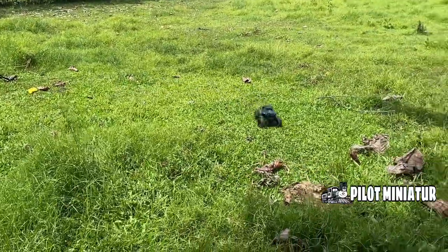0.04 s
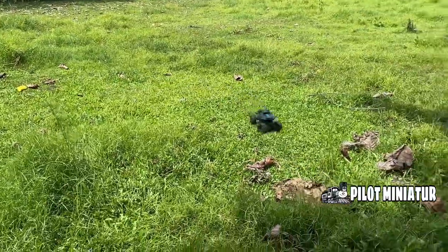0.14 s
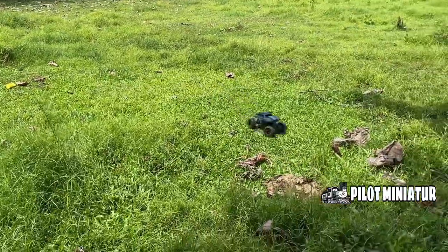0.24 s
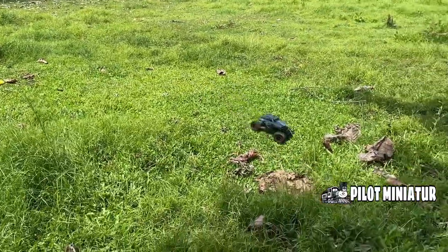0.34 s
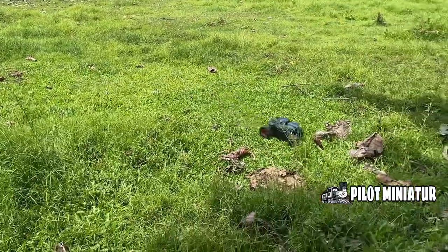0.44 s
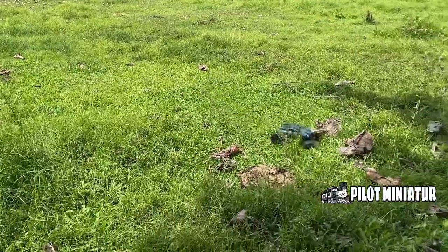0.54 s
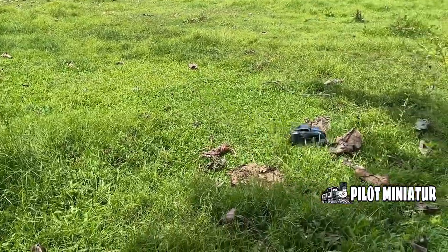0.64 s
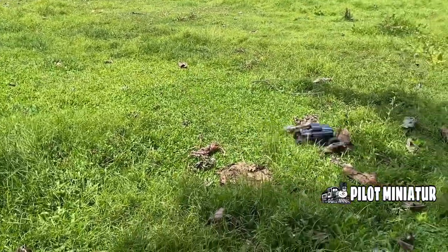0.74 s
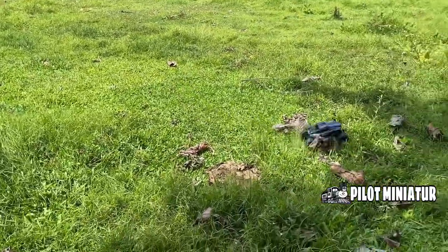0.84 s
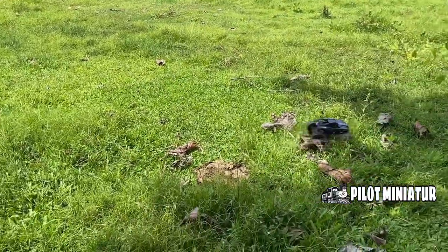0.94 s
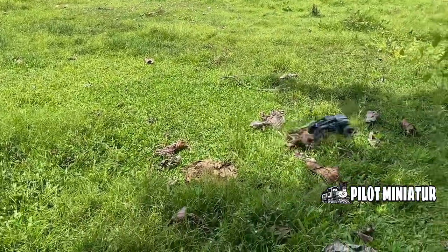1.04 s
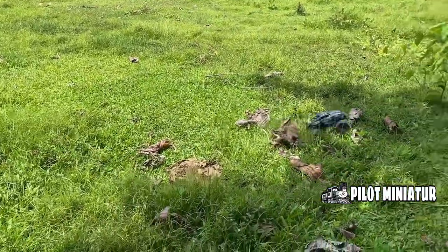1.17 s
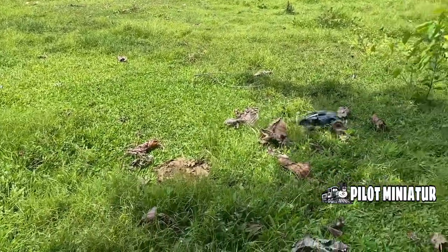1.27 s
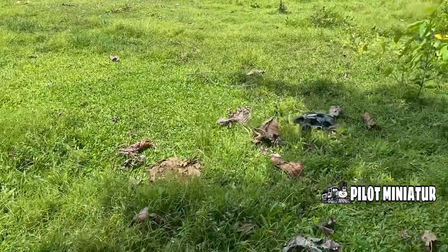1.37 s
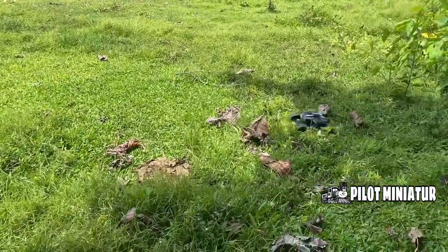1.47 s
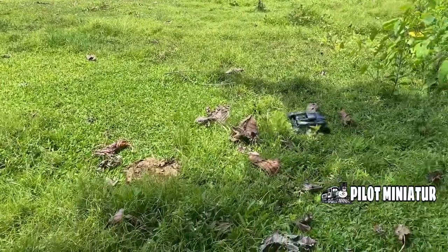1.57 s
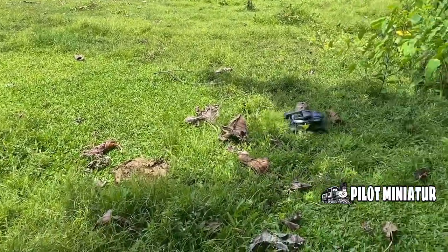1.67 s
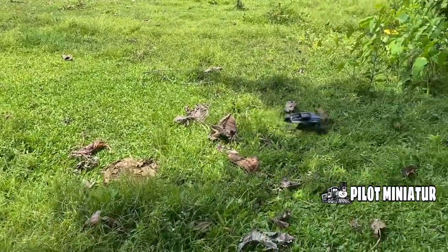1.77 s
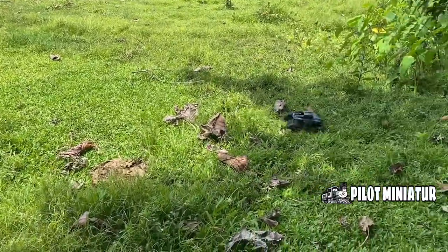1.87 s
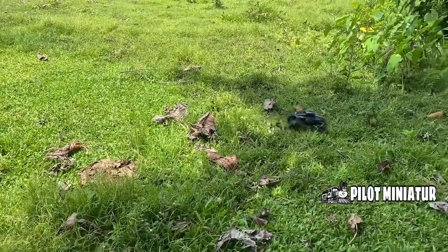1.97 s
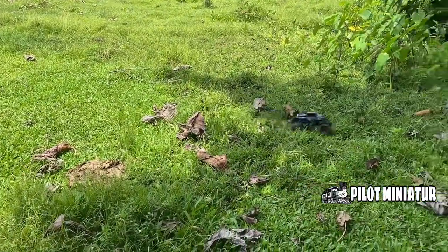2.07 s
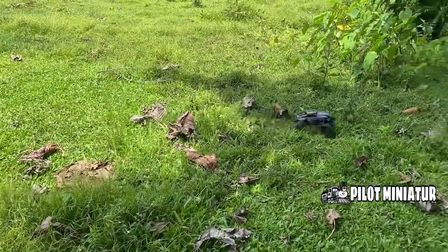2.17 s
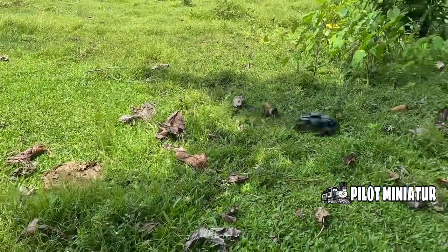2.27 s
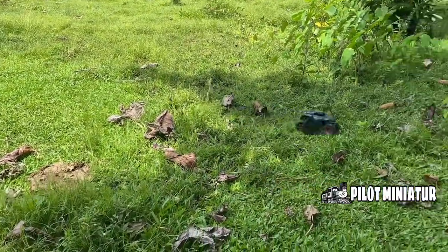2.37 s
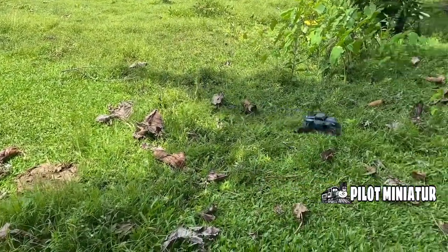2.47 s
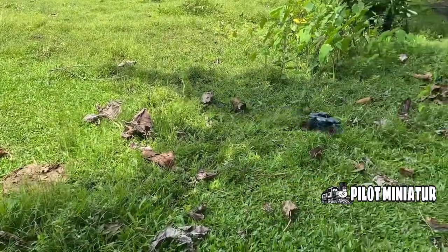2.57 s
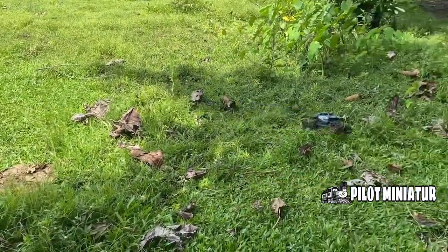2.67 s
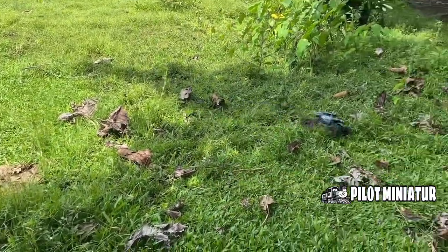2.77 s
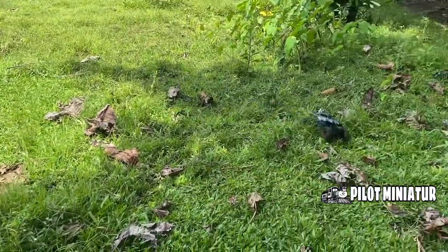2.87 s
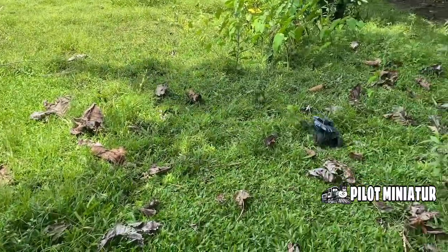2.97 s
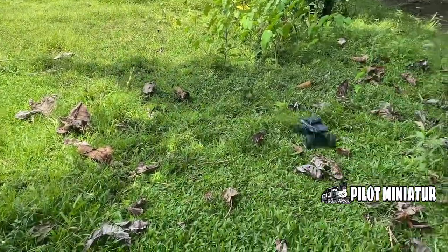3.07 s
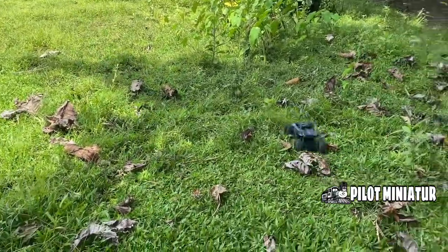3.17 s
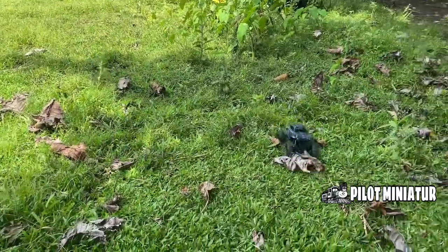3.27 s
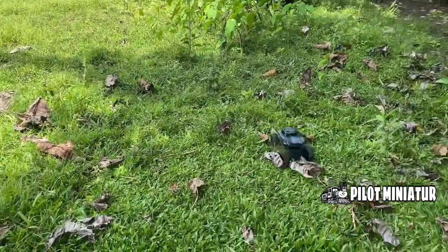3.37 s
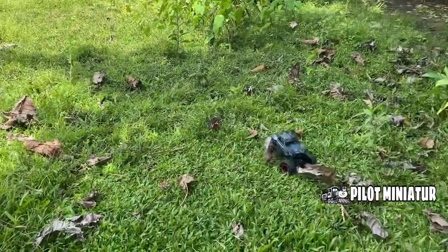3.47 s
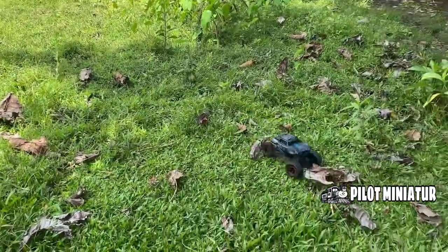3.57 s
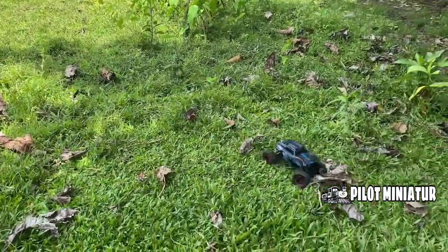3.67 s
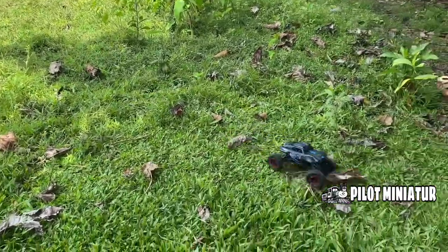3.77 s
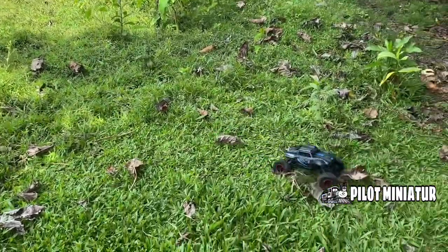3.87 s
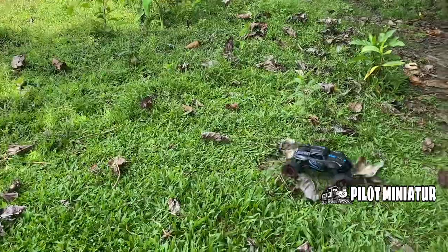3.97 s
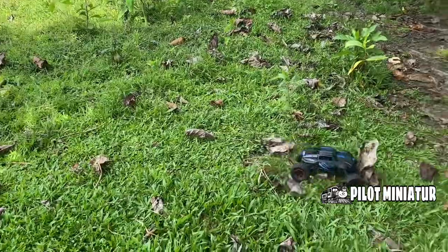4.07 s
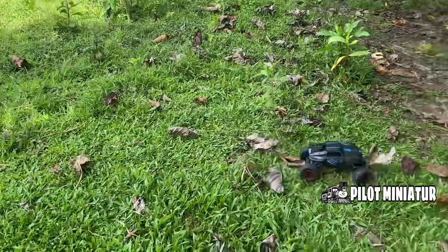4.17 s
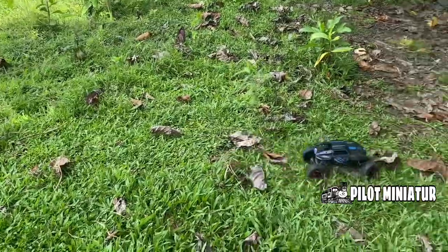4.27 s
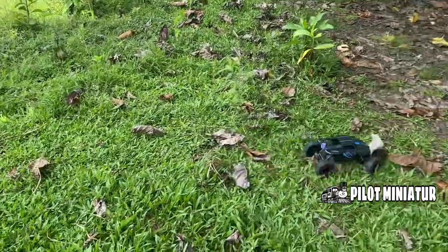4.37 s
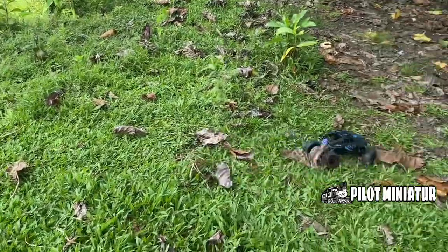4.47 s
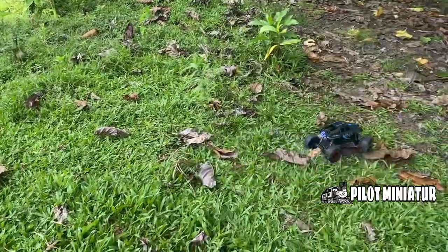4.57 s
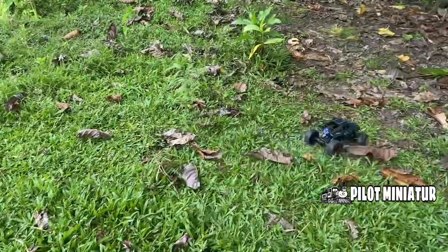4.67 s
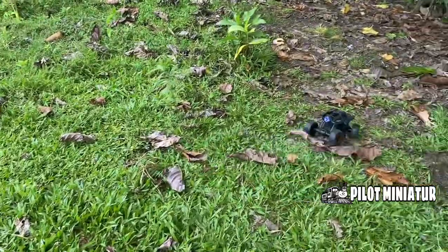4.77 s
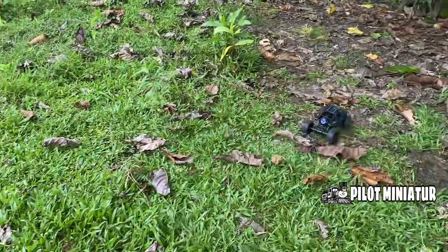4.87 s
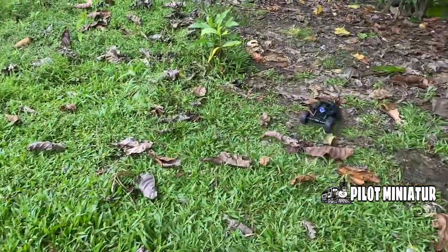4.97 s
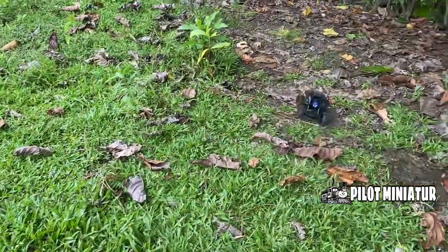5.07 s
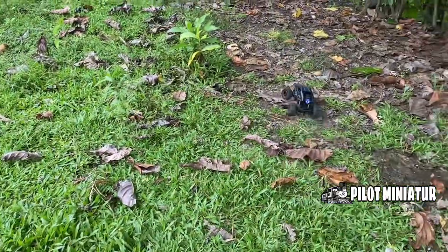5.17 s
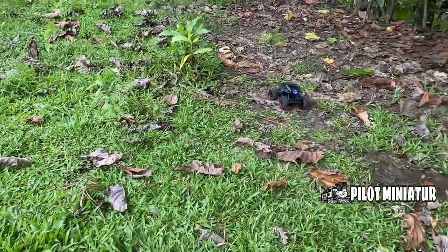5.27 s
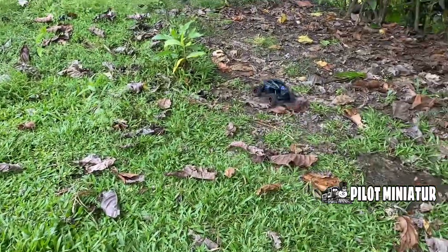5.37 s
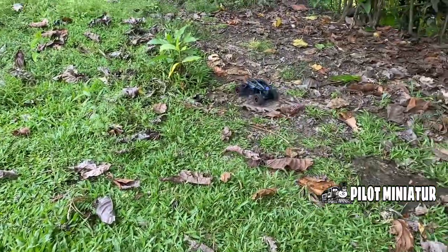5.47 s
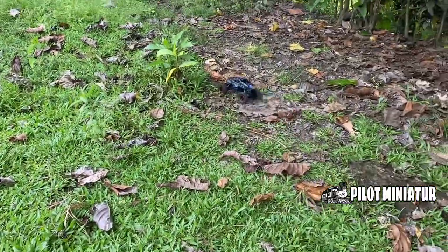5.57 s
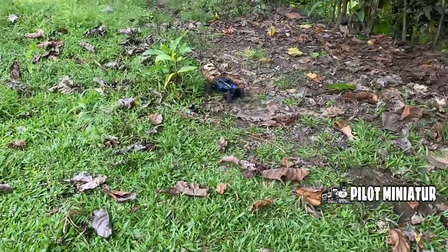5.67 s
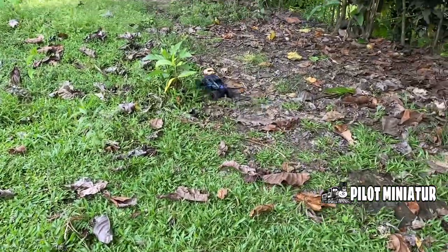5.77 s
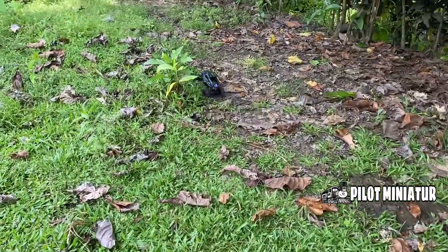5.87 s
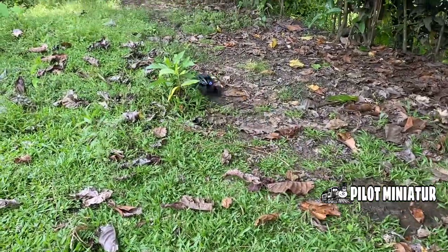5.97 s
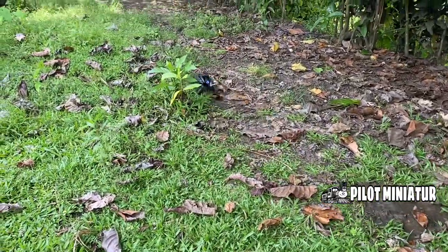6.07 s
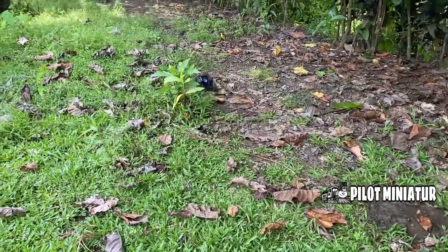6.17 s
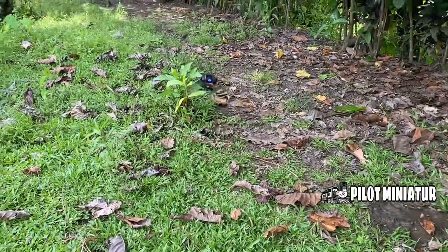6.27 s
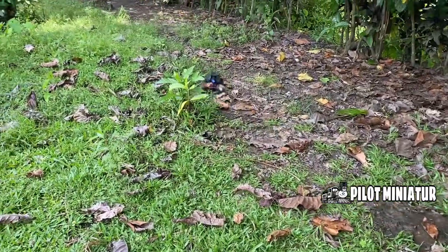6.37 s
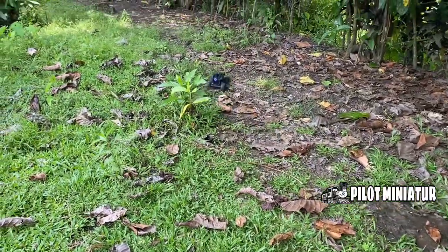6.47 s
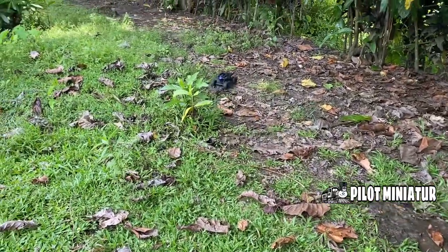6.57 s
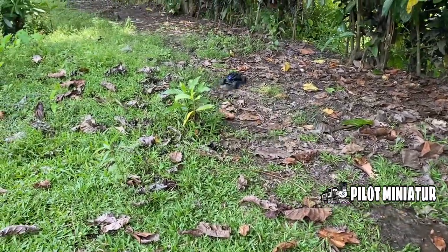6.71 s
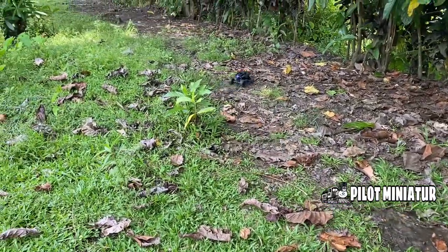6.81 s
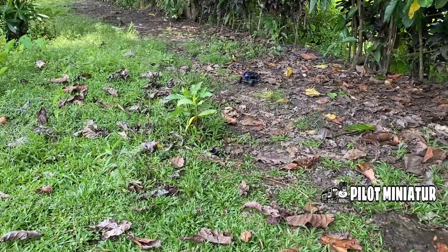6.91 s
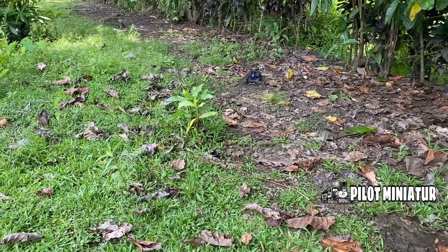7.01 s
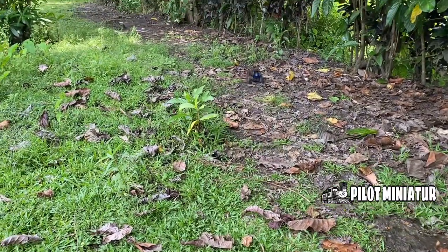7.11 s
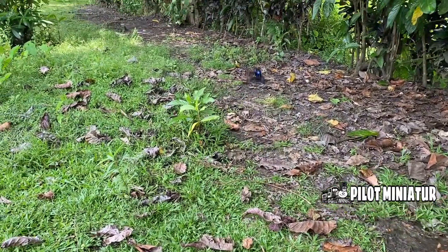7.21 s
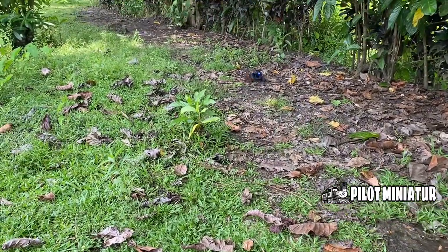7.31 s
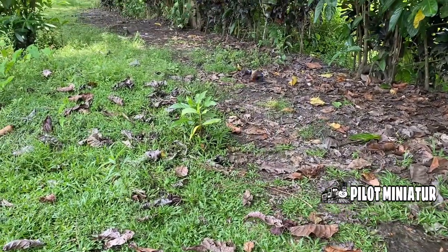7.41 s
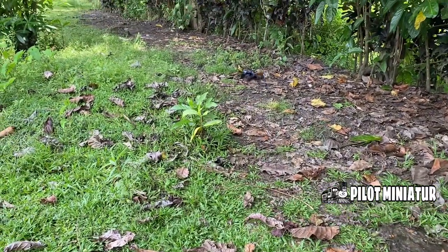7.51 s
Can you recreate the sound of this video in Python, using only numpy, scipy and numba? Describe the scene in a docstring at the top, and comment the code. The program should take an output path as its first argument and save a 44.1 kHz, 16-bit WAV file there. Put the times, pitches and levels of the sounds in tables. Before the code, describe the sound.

A toy car with a buzzing geared motor bumps across a lawn, heard from a few metres away in open air. Tyres hiss in uneven surges through tufts, hollow plastic chatters, and brittle leaves snap in two main clusters, early and midway. Brief wavering gear whines appear between them. After a hard clack the wheels drum on bare ground and the car recedes. Low road rumble and a faint distant engine lie behind, nearly mono.

```python
"""A small electric toy car drives over a lawn, ploughs through dry leaves close by and runs off over bare earth.
Its motor is a repeating clatter of gear teeth; its tyres swish and crackle as streams of tiny random impacts.
Bumps shake or strike the resonances of its plastic shell, and short bursts of noise make leaves snap.
Behind it, filtered noise gives road rumble, the hiss of the garden and puffs of wind on the microphone;
a few related low tones give a distant engine."""
import sys
import numpy as np
from scipy import signal
from scipy.fft import rfft, irfft
from scipy.io import wavfile
from scipy.ndimage import uniform_filter1d
from numba import njit

SR = 44100
rng = np.random.default_rng(int(sys.argv[2]) if len(sys.argv) > 2 else 0)


def transcribe(signal):
    """Save signal, clipped to [-1, 1], as a 16-bit WAV file at the path in sys.argv[1]."""
    frames = np.atleast_2d(signal).T
    limited = np.clip(frames, -1, 1)
    pcm = np.round(limited * 32767).astype(np.int16)
    wavfile.write(sys.argv[1], SR, pcm)


N = 332778
TIME = np.arange(N) / SR

# Background
# distant traffic, before a fixed lift: time_s, level_db
TRAFFIC = [(0, -60), (.6, -59), (1.05, -61), (1.2, -58), (2.9, -59.5), (3.85, -56), (4.33, -58.5),
           (4.5, -63), (5.0, -65.5), (5.2, -57), (5.4, -61.5), (5.77, -60), (5.85, -71), (6.15, -64),
           (6.3, -58.5), (6.55, -60), (6.72, -58), (7.55, -55.5)]
# one engine standing out of the traffic: time_s, firing_rate_hz, level_relative_to_road_db
ENGINE = [(0, 38.87, -25), (1.3, 33.25, -10), (1.7, 31.5, 3.5), (2.1, 31.26, 4.5), (2.45, 32.53, 4.5),
          (2.8, 33.5, -4), (3.6, 43.76, -12), (4.2, 35.93, -11), (5.5, 45.93, -8), (6.55, 38.6, -27),
          (6.7, 37.75, 7), (7.55, 38.26, 2.5)]
# resonance of the exhaust pipe: pitch_hz, gain_db
EXHAUST = [(95, -17.5), (125, 6), (152, 8), (165, 2.5), (195, -6), (240, -25)]
# tone of the road noise, and of the hiss of the garden: pitch_hz, relative_level_db
RUMBLE = [(20, -21), (45, -24), (72, -14), (100, -5.5), (150, 0.5), (200, -1), (250, -5.5), (320, -28),
          (450, -24), (1000, -93)]
AIR = [(50, 10.5), (300, 3.5), (460, -3), (730, -6), (950, -17), (1250, -20), (1900, 6.5), (3000, -17),
       (5800, 10), (9500, -5), (12000, 4), (14000, 6), (16000, 3)]
# tone of the wind: pitch_hz, relative_level_db
EDDIES = [(20, -29), (50, -10), (90, -5.0), (160, 5), (400, -21.0)]
# puffs of wind on the microphone: middle_s, spread_s, level_db
PUFFS = [(0.24, 0.12, -53), (0.414, 0.037, -49), (0.615, 0.017, -45.5), (0.965, .012, -60)]

# The car and the ground
# the car's path: time_s, distance_from_microphone_m
PATH = [(0, 3.27), (.9, 2.78), (1.5, 3.4), (2.3, 4.2), (3.0, 2.74), (3.6, 2.03), (4.3, 3.1), (4.8, 2.84),
        (5.3, 3.86), (6.2, 4.4), (7.55, 5.37)]
# unevenness of the ground under the wheels: time_s, rattle_level_at_1_m_db (before a small lift)
GROUND = [(0, -55), (.6, -48), (1.05, -52), (1.15, -51.5), (1.35, -55.5), (1.5, -46), (1.72, -54),
          (1.88, -47), (2.2, -49), (2.5, -49.5), (2.9, -53), (3.7, -48.5), (4.38, -43.5), (4.6, -43.5),
          (5.05, -47.5), (5.27, -46.5), (5.5, -48), (6.4, -50), (7.55, -47.5)]
# jolts that set the shell rattling: start_s, length_s, rattle_level_at_1_m_db (before a small lift)
JOLTS = [(.15, 0.17, -48), (.345, 0.16, -48.5), (.62, 0.19, -44), (.77, 0.1, -38), (.87, 0.1, -43.5),
         (1.41, 0.061, -48), (1.81, 0.076, -53), (2.34, 0.14, -50), (3.0, 0.088, -49), (3.25, 0.049, -49),
         (3.42, 0.17, -45), (3.69, .11, -45.5), (3.81, 0.16, -41.5), (3.99, 0.24, -40), (4.515, 0.024, -44),
         (4.9, 0.038, -41), (5.13, 0.066, -45), (5.655, 0.053, -39), (5.78, 0.072, -44), (6.03, 0.071, -50),
         (6.21, 0.096, -63), (6.72, 0.032, -44.5), (7.35, 0.062, -40)]
# hops, when the wheels go light and the rolling sounds drop: middle_s, spread_s
HOPS = [(2.003, 0.032), (3.592, 0.02), (4.385, 0.019), (4.882, 0.012), (5.259, 0.022), (6.4, 0.031),
        (6.983, 0.048), (7.283, 0.028)]
HOP_DB = -3  # change in the middle of a hop
# tufts and leaf litter that the tyres plough through: start_s, length_s, swish_level_at_1_m_db (before trims)
TUFTS = [(0.015, 0.14, -35), (0.172, 0.45, -43.5), (0.7, 0.056, -36), (0.761, 0.077, -36),
         (0.858, 0.094, -35.5), (0.999, 0.1, -38.5), (1.363, 0.2, -38), (1.599, 0.29, -44),
         (1.799, 0.11, -36), (1.898, 0.039, -41), (2.059, 0.099, -40), (2.322, 0.1, -41),
         (2.999, 0.166, -48), (3.167, 0.14, -35), (3.37, 0.14, -37), (3.546, 0.065, -47),
         (3.685, 0.3, -46.5), (3.981, 0.19, -46), (4.201, .16, -45), (4.404, 0.21, -45),
         (4.693, 0.073, -40), (4.761, 0.044, -44.5), (4.903, 0.031, -39), (4.994, 0.025, -39),
         (5.134, 0.098, -39), (5.296, 0.084, -39), (5.401, 0.19, -39.5), (5.643, 0.13, -39),
         (5.969, 0.26, -43), (6.494, 0.085, -38), (6.625, 0.11, -38.5), (6.872, 0.047, -45),
         (7.015, 0.14, -40), (7.335, 0.086, -37.5), (7.499, 0.11, -40)]
# patches of dry leaves crushed under the wheels: start_s, length_s, crunch_level_at_1_m_db
LITTER = [(.34, 0.071, -50), (.5, 0.052, -43), (.69, 0.1, -34), (.78, 0.051, -38.5), (.86, 0.25, -48),
          (3.27, 0.066, -42.5), (3.42, 0.09, -45), (3.72, 0.27, -37.5), (3.99, 0.08, -43),
          (4.07, 0.094, -35.5), (4.16, 0.234, -42), (4.44, 0.19, -43.5), (4.69, 0.052, -36),
          (5.13, 0.12, -47), (6.73, 0.023, -45)]
# times to enter and leave a tuft or patch, and for a jolt to start and die away
TUFT_ATTACK_S, TUFT_RELEASE_S, JOLT_ATTACK_S, JOLT_RELEASE_S = .028, .016, .018, .014
ROLL_DB = -41  # swish of steady rolling at 1 m, before trims
# the wheels bounce and grip unevenly, and judder faster: rate a second and swing of the level
BOUNCE_RATE, BOUNCE_DB, JUDDER_RATE, JUDDER_DB = 16, .7, 55, 1.0
# the car reaches bare earth around this time; hard earth makes tyres drum and chassis buzz (levels at 1 m)
BARE_EARTH_S, EARTH_DRUM_DB, EARTH_BUZZ_DB = 4.89, -55, -62
# chassis buzz relative to the ground's unevenness, and drumming relative to the rattle
BUZZ_SHARE_DB, DRUM_SHARE_DB = -8, -15

# Single blows
# dull thumps on the turf: start_s, peak_db, pitch_hz
THUMPS = [(.36, -38, 97), (0.379, -45, 84), (0.422, -38, 147), (0.504, -41.5, 114.6), (0.539, -46, 173),
          (0.579, -39.5, 165), (3.862, -44, 190.6), (5.512, -42, 176.8)]
THUMP_RISE_S = .01  # from the start of a thump to its fullest swell
# wheels and shell hitting the ground: start_s, peak_db, pitch_hz, low_thud_relative_to_clack_db
KNOCKS = [(0.206, -40.5, 1160, -14), (0.24, -39, 555, 1), (.257, -38.5, 606, -10), (0.348, -37.5, 1220, 1),
          (.361, -46, 776, -12), (0.426, -40, 1370, 5), (0.505, -39.5, 1220, 2), (0.581, -44, 692, 5),
          (.654, -42, 668, -7), (.705, -39, 770, -25), (0.736, -38, 750, -12), (0.766, -38, 710, 4),
          (0.81, -37.5, 660, -9), (.837, -47, 1340, 4), (0.931, -37, 770, -1), (0.949, -37.5, 745, 11),
          (0.958, -35, 596, -14), (0.964, -31.5, 760, 0), (0.973, -37, 680, -18), (1.077, -35.5, 684, -1.5),
          (1.453, -44, 1270, -16), (1.818, -42.5, 1200, -15), (1.871, -48, 820, -14),
          (2.398, -42.5, 801, -6), (2.498, -45, 781, -1), (3.052, -40.5, 1346, -19),
          (3.276, -36, 1182, -10), (3.448, -33.5, 750, 0.5), (3.819, -38, 715, -8), (3.834, -46, 638, -9),
          (3.868, -42, 891, -10), (4.095, -36.5, 940, -17), (4.112, -40, 600, -2), (4.139, -40, 820, -6),
          (4.242, -42, 740, 6), (4.315, -41.5, 821, -18), (4.511, -30, 1450, 0), (4.732, -36, 683.4, -5),
          (4.913, -40, 1270, -9), (4.928, -37, 710, 1), (4.968, -38, 1190, -1), (5.131, -36.5, 640, -15),
          (5.164, -58, 777, 4), (5.212, -42, 1221, -13), (5.371, -41, 1208, -17), (5.51, -30.5, 1200, -14),
          (5.653, -43, 1179, -17), (5.677, -41, 1220, -20), (5.902, -38.5, 1160, -13),
          (6.222, -44, 1231, -20), (6.637, -44, 1190, -11), (6.676, -44, 1160, -12), (6.746, -44, 1304, -8),
          (6.919, -40.5, 1174, -12)]
# dry leaves and stalks snapping: start_s, peak_db (before a small lift), pitch_hz
SNAPS = [(.7153, -33, 3610), (.7387, -31, 3030), (0.7663, -31.5, 2430), (0.798, -29, 3700),
         (.811, -35, 1800), (0.8825, -29, 2870), (0.916, -34, 4200), (0.933, -35, 3100),
         (1.044, -27.5, 2820), (1.063, -32, 3380), (1.0755, -26.5, 2960), (3.74, -36, 1567),
         (3.8606, -25.5, 2900), (3.878, -34, 3120), (3.9442, -36, 3190), (4.0067, -27.5, 2515),
         (4.0686, -27.5, 2816), (4.089, -37, 3600), (4.1096, -33, 3500), (4.1156, -26.5, 2530),
         (4.1333, -28, 3450), (4.146, -37, 3300), (4.1837, -30.5, 2970), (4.2786, -43, 2810),
         (4.512, -24.5, 2650), (4.8449, -30.5, 3000), (5.2095, -40, 2847), (5.789, -36, 2700),
         (7.1117, -40, 2850), (7.1335, -37, 2560), (7.459, -41, 2910)]

# Materials and tone
# resonances of the plastic shell, of the gearbox and of dry leaves: pitch_hz, width_hz, gain_db
SHELL = [(587, 93, -3), (702, 120, -8), (804, 170, -2), (1190, 203, 0), (1553, 185, -5.5), (2080, 67, -7),
         (2305, 170, -4), (2780, 210, -4.5)]
GEARBOX = [(2910, 210, 3), (3670, 420, -11.5), (3563, 380, 6), (4170, 330, -1.5), (5540, 550, -15),
           (6680, 2000, -8.5)]
LEAF = [(1550, 500, 3), (2670, 320, 10.0), (3010, 1050, 9), (4150, 1500, -3), (7840, 2900, 0.0)]
# tone of the swish, and of its finest treble: pitch_hz, relative_level_db
GRASS = [(400, -51), (1500, 1.5), (2800, -3.5), (4200, 7), (5000, 5.5), (5800, 9), (7000, 5), (7800, -0.5),
         (8800, 4.5), (10000, -0.5), (11000, -0.5), (12000, -15.5), (16000, -20)]
SIZZLE = [(7000, -26), (8800, -7), (9300, -16), (10900, -7), (12400, -12), (13600, 3), (16000, -3)]
# level of that finest treble: time_s, sizzle_relative_to_swish_db
BRIGHTNESS = [(0, -7), (.4, -21), (.8, -3.5), (1.25, -18), (1.5, -7), (2.2, -22), (2.9, -20), (3.3, -8.5),
              (3.8, -6), (4.7, 0.5), (5.05, -23), (5.5, -7), (6.1, -29), (7.55, -7)]
# tone of the shell, and the filter that picks out its low modes: pitch_hz, gain_db
SHELL_TONE = [(100, -18), (330, -1), (460, -5), (700, 0), (2800, 0), (6000, -12)]
SHELL_LOW = [(900, 0), (1200, -40)]
# tone of the whirr, and of the teeth under load: pitch_hz, gain_db
WHIRR_TONE = [(1000, -12.5), (2600, -7.5), (7500, -7.0), (12000, -6.5)]
KEEN_TONE = [(2500, -37.0), (4500, -2.0), (6500, -1.5), (10500, -1.0)]
# sound at the sides: pitch_hz, side_gain_db
WIDTH = [(30, -13), (90, -21), (180, -22), (300, -11), (1000, -14.5), (3300, -14), (4500, -21),
         (6000, -36), (13000, -50)]

# The motor
# speed of the motor before the grass brakes it: time_s, turns_per_second_hz
SPEED = [(0, 574.6), (1.4, 564.7), (2.2, 586.5), (2.85, 600), (3.15, 620), (3.3, 560), (3.52, 520),
         (3.7, 585), (4.1, 618), (5.5, 607.8), (7.55, 586.5)]
# strength of the motor's whirr: time_s, whirr_level_at_1_m_db
WHIRR = [(0, -60), (.4, -47.5), (.75, -39.5), (1.0, -43), (1.35, -42), (1.47, -35.5), (1.72, -41.5),
         (2.3, -40), (2.85, -43), (3.45, -40.5), (3.58, -45), (3.85, -39), (4.7, -39), (5.05, -48),
         (5.35, -44), (5.7, -52), (6.1, -43.5), (6.6, -52.5)]
# moments when the gears sing out: start_s, length_s, start_pitch_hz, end_pitch_hz, level_db
WHINES = [(1.149, 0.16, 7300, 6800, -52), (1.14, .1, 3600, 3150, -57), (1.285, 0.097, 2656, 2820, -54),
          (1.42, 0.24, 2768, 2870, -57), (1.41, .09, 3550, 3900, -52.5), (1.985, 0.14, 4100, 4345, -59),
          (2.62, 0.44, 3560, 3450, -55.5), (2.7, 0.2, 4180, 4380, -55), (2.92, 0.13, 4200, 4420, -55),
          (2.88, .16, 6400, 7000, -58), (3.17, 0.15, 5900, 4750, -49.5), (3.39, .15, 4700, 3800, -49.5),
          (4.29, 0.1, 3720, 3820, -52.5), (4.54, .26, 3620, 3594, -55)]
# most that thick grass can take of the motor's speed (share), and the tuft level at 1 m that takes half of it
SAG, SAG_AT_DB = .05, -36.5

TOP_HZ = 15800  # the recorder's upper limit


def undb(db):
    """Turn decibels into a gain."""
    return np.exp(np.asarray(db) * np.log(10) / 20)


def unit(x):
    """Scale a sound to an average (rms) level of 1."""
    return x / np.sqrt(np.mean(x ** 2))


def curves(table):
    """Join the points of a time table by straight lines, one curve a column."""
    s, *columns = np.transpose(table)
    return [np.interp(TIME, s, column) for column in columns]


def walk(rate):
    """Wander at random between new values, rate of them a second, with a spread near 1."""
    knots = rng.standard_normal(4096)
    return 1.2 * np.interp(TIME * rate, np.arange(len(knots)), knots)


def colour(x, spectrum):
    """Make each pitch louder or softer by a table of (pitch_hz, gain_db)."""
    hz, db = np.transpose(spectrum)
    bins = np.maximum(np.arange(N // 2 + 1) * SR / N, 1)
    gain = undb(np.interp(np.log(bins), np.log(hz), db))
    return irfft(rfft(x) * gain, N)


def band(x, hz, width):
    """Pass a sound through one resonance, with gain 1 at its centre."""
    b, a = signal.iirpeak(min(hz, SR / 2 - 1), hz / width, fs=SR)
    return signal.lfilter(b, a, x)


def ring(x, modes):
    """Drive all the fixed resonances of a body."""
    return sum(undb(db) * band(x, hz, width) for hz, width, db in modes)


@njit
def sweep(x, hz, width):
    """Pass a sound through one resonance whose centre moves from sample to sample."""
    y, b, low = np.empty(len(x)), 0., 0.
    for i in range(len(x)):
        g, k = np.tan(np.pi * hz[i] / SR), width / hz[i]
        v = (b + g * (x[i] - low)) / (1 + g * (g + k))
        b, low, y[i] = 2 * v - b, low + 2 * g * v, k * v
    return y


def flex(x, modes, drift, flicker_db):
    """Drive a flexing body: each resonance shifts in pitch and swells on its own."""
    out = np.zeros(N)
    for hz, width, db in modes:
        gain = undb(db + flicker_db * walk(22))
        moving_hz = hz * (1 + drift * walk(25))
        out += gain * sweep(x, moving_hz, float(width))
    return out


def grains(rate, spread_db):
    """Scatter tiny impacts at random, rate a second, of widely differing size."""
    chance, size, sign = rng.random(N), rng.standard_normal(N), rng.choice([-1, 1], N)
    return unit((chance < rate / SR) * sign * undb(spread_db * np.clip(size, -2, 2)))


def burst(decay_s, tail_db, tail_s):
    """Make noise for a sharp contact followed by a weaker scrape."""
    t = TIME[:SR // 8]
    return rng.standard_normal(len(t)) * (np.exp(-t / decay_s) + undb(tail_db) * np.exp(-t / tail_s))


def add(track, s, sound, db):
    """Place a sound on the track with the given peak level."""
    start = int(np.clip(s * SR, 0, N - 1))
    track[start:start + len(sound)] += (sound * undb(db) / np.abs(sound).max())[:N - start]


def swells(events, attack_s, release_s):
    """Add up the power of (start_s, length_s, level_db) events that each rise, hold and die away."""
    power = np.zeros(N)
    for s, length_s, db in events:
        span = slice(max(int(s * SR), 0), int((s + length_s + .5) * SR))
        age = TIME[span] - s
        rise = np.clip(age / attack_s, 0, 1)
        fall = np.exp(-np.maximum(age - length_s, 0) / release_s)
        power[span] += (undb(db) * rise * fall) ** 2
    return power


def scatter(x):
    """Short reflections from the ground and the hedge: many random echoes that die away fast."""
    t = TIME[:SR // 6]
    echo = rng.standard_normal(len(t)) * np.exp(-t / .025)
    return signal.fftconvolve(x, echo / np.linalg.norm(echo))[:N]


def flutter(x, spread=0.194, quiver=0.0095, count=6):
    """Sound also comes by short paths that stretch as the car pitches; mixing them thins and lifts pitches."""
    pad = SR // 50
    # eight times finer steps, so the delays can glide smoothly
    fine = np.concatenate([np.zeros(8 * pad), signal.resample_poly(x, 8, 1)])
    now = np.arange(N) + pad
    out = x.copy()
    for path_s in np.linspace(.0006, .0032, count):
        lag = path_s * np.exp(spread * walk(1.6) + quiver * walk(22))
        sign = rng.choice([-1, 1])
        out += sign * fine[(8 * (now - SR * np.minimum(lag, .01))).astype(int)]
    # the paths share out the power without adding any
    before, after = (uniform_filter1d(v ** 2, size=SR // 25) + 1e-16 for v in (x, out))
    return out * np.sqrt(before / after)


def air():
    """The hiss of the garden: coloured noise whose level drifts slightly."""
    return undb(-61) * unit(colour(rng.standard_normal(N), AIR)) * undb(.8 * walk(3))


def wind():
    """Soft buffets on the microphone: low noise that swells with each puff."""
    eddies = unit(colour(rng.standard_normal(N), EDDIES))
    puffs = sum(undb(db) * np.exp(-((TIME - s) / spread_s) ** 2 / 2) for s, spread_s, db in PUFFS)
    return eddies * puffs


def traffic():
    """Far road noise with only its bass left; one engine throbs through it, its pipe favouring some partials."""
    (level_db,), (firing_hz, engine_db) = curves(TRAFFIC), curves(ENGINE)
    phase = 2 * np.pi * np.cumsum(firing_hz * (1 + 0.014 * walk(12))) / SR
    pipe_hz, pipe_db = np.transpose(EXHAUST)
    engine = np.zeros(N)
    for k in range(3, 8):  # multiples of the firing rate
        partial_db = np.interp(k * firing_hz, pipe_hz, pipe_db) + 2.2 * walk(11)
        engine += undb(partial_db) * np.cos(k * phase)
    engine = unit(engine)
    throb = 1 + 0.43 * np.cos(phase)
    road = unit(colour(rng.standard_normal(N) * throb * undb(2 * walk(30)), RUMBLE))
    share = undb(engine_db)
    return undb(level_db + 4.5) * (road + share * engine) / np.sqrt(1 + share ** 2)


def nearness():
    """Sound weakens as one over the distance of the car."""
    metres, = curves(PATH)
    return 1 / np.maximum(metres, .5)


def heard_db(power):
    """Level at the microphone of a power given at 1 m."""
    return 10 * np.log10(power * nearness() ** 2)


def tuft_power():
    """Swish power at 1 m of the tufts that the tyres are in."""
    return swells(TUFTS, TUFT_ATTACK_S, TUFT_RELEASE_S)


def brushing():
    """Level of the swish: steady rolling, and a surge in each tuft."""
    return heard_db(undb(ROLL_DB) ** 2 + tuft_power())


def shaking():
    """Level of the rattle: uneven ground keeps it going and each jolt stirs it up."""
    ground_db, = curves(GROUND)
    return heard_db(undb(ground_db) ** 2 + swells(JOLTS, JOLT_ATTACK_S, JOLT_RELEASE_S))


def bounce():
    """Gain of all rolling sounds as the wheels press harder and lighter on the ground, or hop off it."""
    airborne = sum(np.exp(-((TIME - s) / spread_s) ** 2) for s, spread_s in HOPS)
    return undb(BOUNCE_DB * walk(BOUNCE_RATE) + JUDDER_DB * walk(JUDDER_RATE) + HOP_DB * airborne)


def braking():
    """Share of its free speed that the motor keeps in the grass; its inertia smooths the changes."""
    drag = uniform_filter1d(tuft_power(), size=SR // 8)
    return 1 - SAG * drag / (drag + undb(SAG_AT_DB) ** 2)


def thumps():
    """The soft ground takes a blow with a few low cycles."""
    track, t = np.zeros(N), TIME[:SR // 8]
    for s, db, hz in THUMPS:
        swell = (t / THUMP_RISE_S) ** 2 * np.exp(-2 * t / THUMP_RISE_S)
        add(track, s, swell * np.sin(2 * np.pi * (hz * t + rng.random())), db)
    return track


def knocks():
    """Hard landings clack the shell's resonances while the soft tyres thud."""
    track = np.zeros(N)
    for s, db, hz, thud_db in KNOCKS:
        blow = burst(.0035, -15, .014)
        pitched = unit(band(band(blow, hz, 93), hz, 310))
        clack = unit(unit(ring(blow, SHELL)) + pitched)
        thud = unit(band(band(blow, 220, 490), 190, 830))
        add(track, s, clack + undb(thud_db) * thud, db)
    return track


def leaves():
    """A dry leaf breaks with one short crack and a few crumbs."""
    track, t = np.zeros(N), TIME[:SR // 8]
    for s, db, hz in SNAPS:
        crumbs = (rng.random(len(t)) < 1500 / SR) * rng.standard_normal(len(t)) * np.exp(-t / .006)
        crack = burst(0.0014, -17, 0.008) + 1.6 * crumbs
        # the leaf bends for a moment before it gives
        crack = crack * (1 - np.exp(-t / 0.0016))
        add(track, s, band(crack, hz, 530) + undb(-22.5) * crack, db + 0.5)
    return track


def crunch():
    """Dry leaves crackle densely under the treads in each patch: tiny snaps ring resonances that keep shifting."""
    snaps = flutter(grains(400, 4.5), spread=.1, quiver=.01, count=3) * undb(2 * walk(110))
    crushed = unit(flex(snaps, LEAF, drift=.07, flicker_db=2.5))
    return np.sqrt(swells(LITTER, TUFT_ATTACK_S, TUFT_RELEASE_S)) * nearness() * crushed


def rattle(bumps_db):
    """The loose shell chatters on uneven ground, the chassis buzzes and the hollow tyres drum."""
    earth = np.clip((TIME - BARE_EARTH_S) / .5 + .5, 0, 1)  # half a second to roll onto it
    ground_db, = curves(GROUND)
    buzz_gain = np.hypot(undb(ground_db + BUZZ_SHARE_DB), earth * undb(EARTH_BUZZ_DB)) * nearness()
    drum_gain = np.hypot(earth * undb(EARTH_DRUM_DB) * nearness(), undb(bumps_db + DRUM_SHARE_DB))

    taps = grains(380, 3.6) + undb(-4) * grains(3000, 3)
    taps = flutter(taps * undb(2.2 * walk(60) + 1.2 * walk(20)), count=4)
    panels = unit(flex(taps, SHELL, drift=.03, flicker_db=1.5))
    body = panels + undb(-15.5) * unit(band(taps, 290, 230))
    shell = unit(colour(body, SHELL_TONE))
    # the springs soak up heavy shaking, so the shell's low modes grow less than the rest
    boom = colour(shell, SHELL_LOW)
    shell = shell - boom * (1 - undb(-.7 * np.maximum(bumps_db + 53, 0)))

    chassis = flex(grains(350, 3.5), [(1225, 170, 0)], drift=.02, flicker_db=2)
    buzz = unit(band(chassis, 1230, 400))
    drum = unit(band(band(grains(900, 3.5), 265, 110), 263, 155)) * undb(2.5 * walk(30))
    return undb(bumps_db + 1.0) * shell + buzz_gain * buzz + drum_gain * drum


def tyres(swish_db):
    """Blades of grass flick past the treads in clumps; dry bits crackle among them."""
    bright_db, = curves(BRIGHTNESS)
    blades = grains(14000, 3) * undb(1.7 * walk(60))
    crackle = undb(-6) * grains(260, 4.2) * undb(2 * walk(30))
    contact = flutter(blades, spread=.08, quiver=.008, count=5) + crackle
    swish = undb(-2.0) * unit(colour(contact, GRASS))
    sizzle = undb(bright_db + 1.2 * walk(25)) * unit(colour(contact, SIZZLE))
    return undb(swish_db) * (swish + sizzle)


def whines():
    """The gears sing out for a moment, each whine gliding from one pitch to another."""
    track = np.zeros(N)
    wobble = 1 + .018 * walk(60) + .018 * walk(520)
    rough = undb(3.5 * walk(90))
    for s, length_s, start_hz, end_hz, db in WHINES:
        progress = (TIME - s) / length_s
        on = (progress > 0) & (progress < 1)
        hz = (start_hz + (end_hz - start_hz) * progress[on]) * wobble[on]
        swell = np.sqrt(2 * np.sin(np.pi * progress[on]))
        track[on] += undb(db) * swell * rough[on] * np.sin(2 * np.pi * np.cumsum(hz) / SR)
    return track


def motor(swish_db):
    """Every turn of the motor repeats an uneven clatter of teeth, which rings the gearbox."""
    (turn_hz,), (level_db,) = curves(SPEED), curves(WHIRR)
    whirr_db = heard_db(undb(level_db) ** 2)
    # the grass tugs at the wheels, so the speed never holds still
    tug = 1 + .016 * walk(12) + .016 * walk(50)
    turns = np.cumsum(turn_hz * braking() * tug) / SR
    # play between the teeth smears each partial and makes it flicker
    clatter = np.zeros(N)
    for k in np.arange(4, 18, .5):  # cycles per turn
        clatter += undb(4 * walk(45)) * np.cos(2 * np.pi * k * turns + 1.3 * walk(130))
    clatter = unit(clatter)
    rasp = unit(rng.standard_normal(N) * (1 + 1.2 * np.cos(2 * np.pi * turns)))
    teeth = undb(-5) * clatter + rasp
    housing = flex(teeth, GEARBOX, drift=.018, flicker_db=2)
    whirr = unit(colour(housing, WHIRR_TONE))
    # thick grass loads the teeth, and their upper partials rise with its swish
    keen = unit(colour(clatter, KEEN_TONE))
    return undb(whirr_db) * whirr + undb(swish_db - 11.5) * keen


def scene():
    """The car stays straight ahead; its reflections, the traffic and the air give a little width."""
    swish_db, bumps_db = brushing(), shaking()
    drive = flutter(motor(swish_db), spread=.07, quiver=.02, count=4)
    treads = flutter(tyres(swish_db), spread=.12, quiver=.009, count=6)
    rolling = drive + treads + whines() + rattle(bumps_db) + crunch()
    car = bounce() * rolling + knocks() + thumps() + leaves()
    mid = car + undb(-19.0) * scatter(car) + traffic() + air() + wind()
    # fresh random draws make the sides differ from the middle
    side = colour(scatter(car) + traffic() + air(), WIDTH)
    return np.array([mid + side, mid - side])


def record(dry):
    """The recorder cuts the top steeply."""
    return signal.sosfilt(signal.ellip(12, .1, 80, TOP_HZ, fs=SR, output="sos"), dry)


dry = scene()
out = record(dry)
transcribe(out)
```